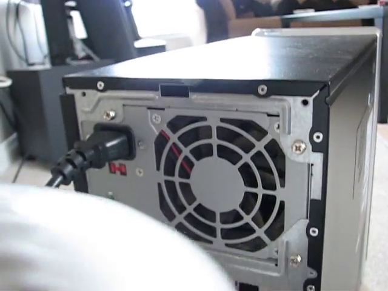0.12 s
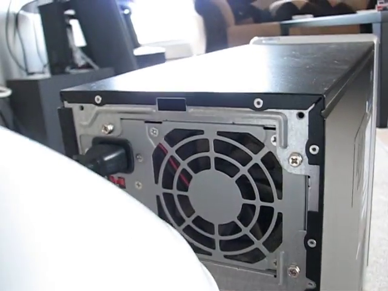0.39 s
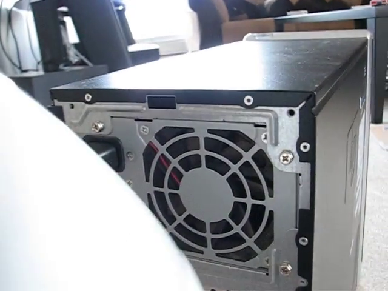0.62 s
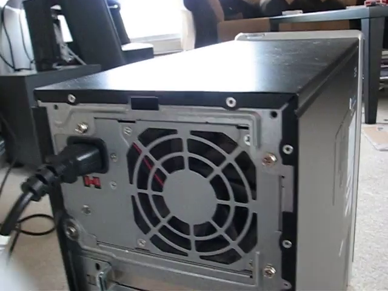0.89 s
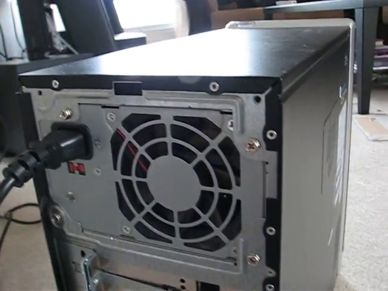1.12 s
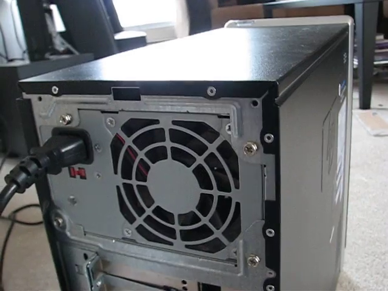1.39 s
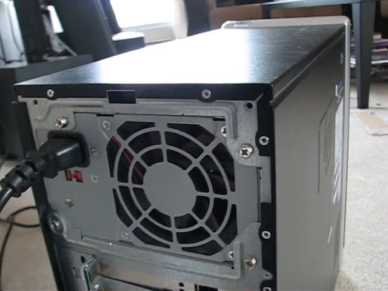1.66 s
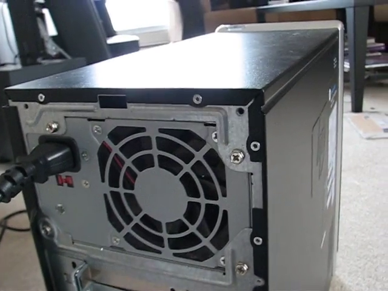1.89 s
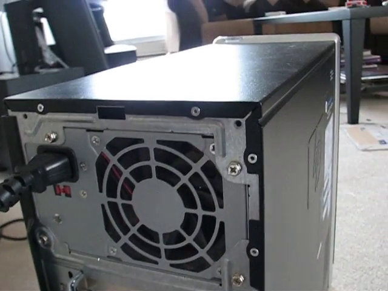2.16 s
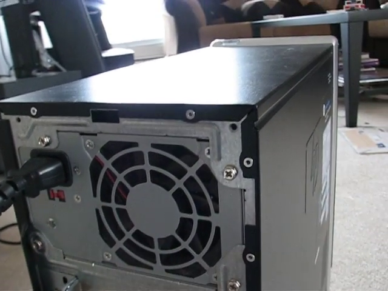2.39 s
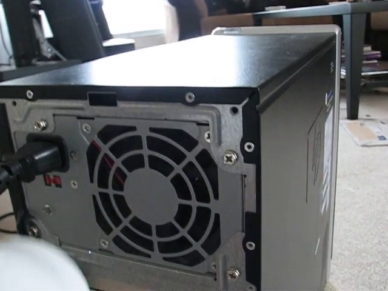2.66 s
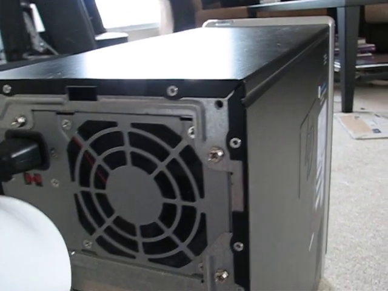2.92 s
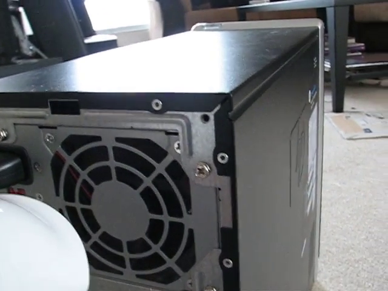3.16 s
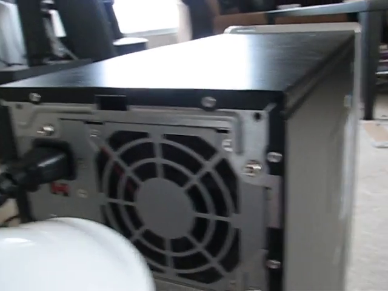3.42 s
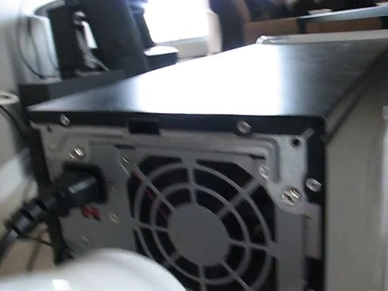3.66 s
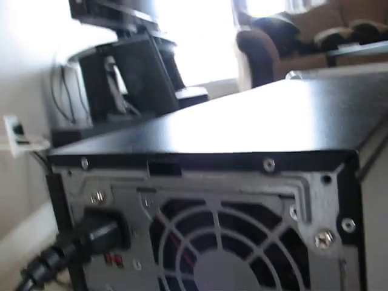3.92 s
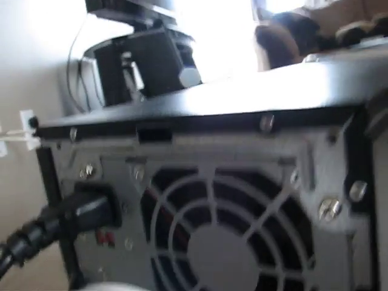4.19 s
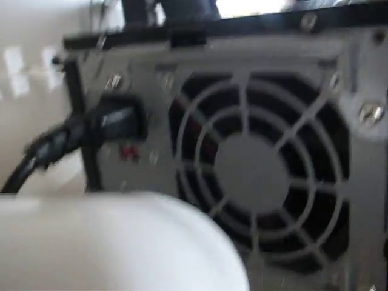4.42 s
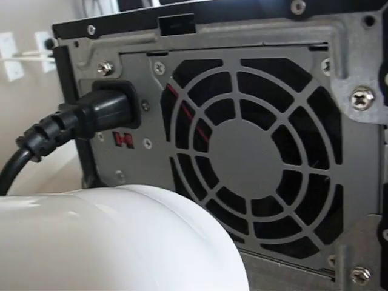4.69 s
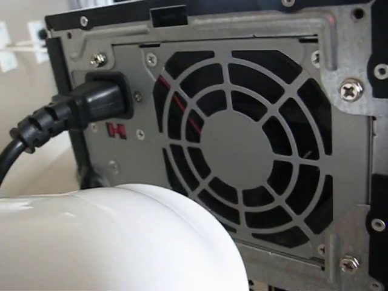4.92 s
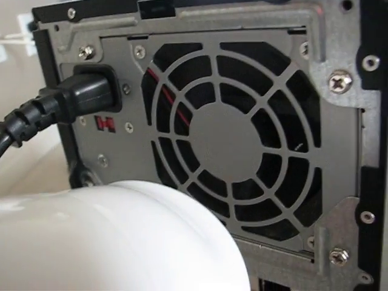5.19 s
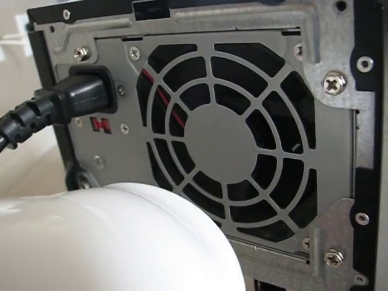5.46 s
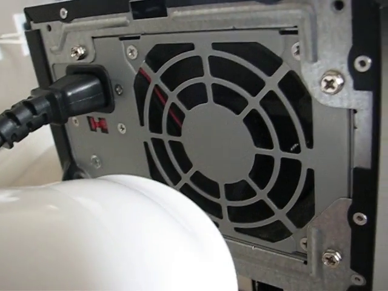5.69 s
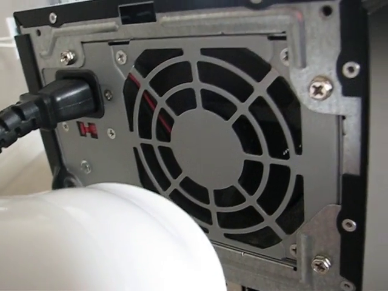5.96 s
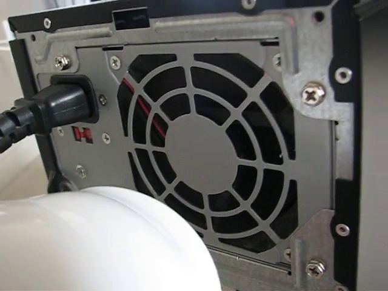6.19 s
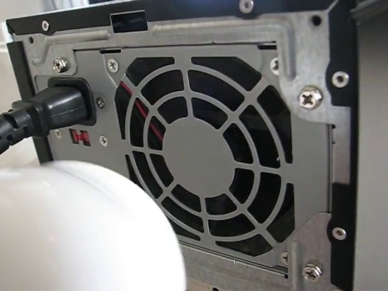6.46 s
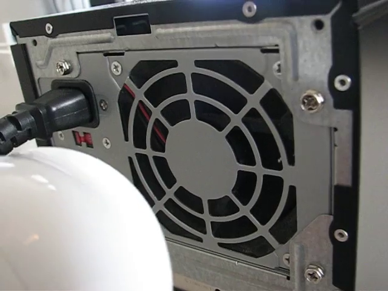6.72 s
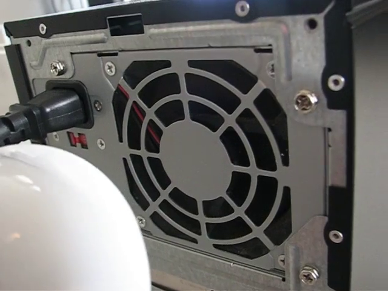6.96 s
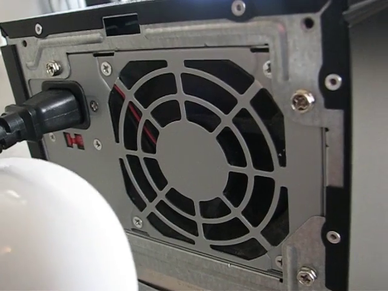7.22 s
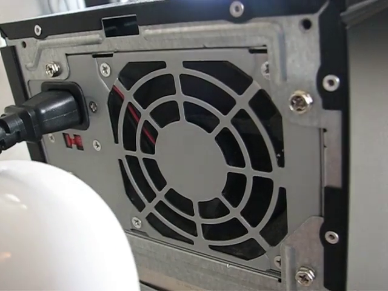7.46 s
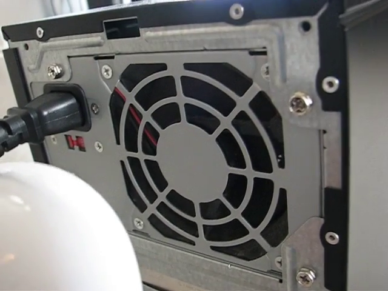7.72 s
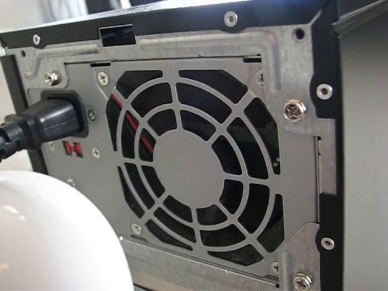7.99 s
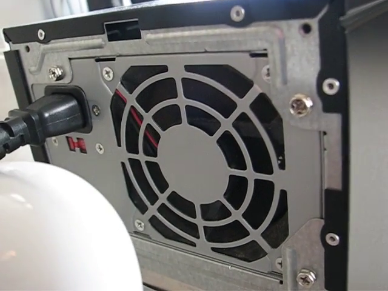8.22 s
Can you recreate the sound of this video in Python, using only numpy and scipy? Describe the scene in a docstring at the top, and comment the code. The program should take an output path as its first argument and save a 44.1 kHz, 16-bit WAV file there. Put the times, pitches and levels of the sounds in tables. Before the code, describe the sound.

Faint camera ticking, handling clatter, then a handheld dryer spins up quickly into loud rushing air and whine, shifting tone against a metal computer case.

```python
"""A small camera's drive whines and ticks over quiet room air while a hair dryer is picked up.
Its plastic shell clicks as ringing modes, skin rubs on it as grainy noise, and it knocks a metal computer case.
Switched on, it blows a rush of coloured noise, loud at first, and sines of its seven blades whine up with the shaft.
The rush changes colour as the dryer is turned and blows into the case's idle fan, which windmills: its blade tone
climbs past the dryer's shaft tone, then sinks through it to just below. Dryer and case lean mostly to the left."""
import sys
import numpy as np
from scipy import signal
from scipy.fft import rfft, irfft
from scipy.io import wavfile
from scipy.ndimage import uniform_filter1d, map_coordinates

SR = 44100
rng = np.random.default_rng(int(sys.argv[2]) if len(sys.argv) > 2 else 0)


def volts_from_db(level):
    """Convert decibel levels to linear amplitude ratios."""
    exponent = np.asarray(level, float) / 20
    return 10 ** exponent


def output_pcm(signal):
    """Save a mono or channel-first signal as 16-bit PCM at the path in sys.argv[1].

    Samples are clipped to [-1, 1] before scaling.
    """
    pcm = np.clip(np.atleast_2d(signal).T, -1, 1) * 32767
    wavfile.write(sys.argv[1], SR, np.round(pcm).astype(np.int16))


N = 368676
T = np.arange(N) / SR  # seconds
HZ = np.fft.rfftfreq(N, 1 / SR)
START_S = 1.55  # the dryer's motor starts

# Ways of holding the dryer. Each row: start in seconds, end in seconds, colour of the rush as pose 0-3,
# rush level in dB, how strongly the jet drives the case in dB.
HOLDS = [(1.55, 1.96, 0., -3.5, -30), (2.02, 2.18, 1., -1, -29), (2.3, 2.38, 1., 0, -28),
         (2.46, 2.58, 1.25, -0.1, -23.5), (2.7, 2.82, 1., -0.5, -27), (2.93, 3.08, 1., -0.7, -22),
         (3.32, 3.5, 1.37, -0.44, -16.5), (4.1, 4.55, 2., 0.93, -10), (5.2, 5.55, 2., 1.3, -5.5),
         (5.8, 6.3, 2, 1.1, -6.5), (6.62, 8.36, 3., 1.37, -1)]
# Tone of the room air. Each row: frequency in Hz, relative level in dB.
ROOM_COLOUR = [(20, -18), (55, 0), (130, -5), (340, -4.5), (590, -6.5), (734, 4), (880, -6.5),
               (3000, -15.5), (7500, -17), (9800, -21), (16000, -27)]
# Room air common to both ports. Each row: frequency in Hz, shared part 0-1.
ROOM_SHARED = [(60, 0.67), (290, 0.71), (640, 0.14), (3000, 0.082)]
# The background sinks once the dryer runs. Each row: time in seconds, gain in dB.
HUSH = [(1.6, 1), (2.8, -36)]
# Strokes of the camera drive. Each row: first stroke in seconds, period in seconds.
DRIVE_TIMES = [(.0262, 1 / 30), (.052, .098), (.045, .098), (.1295, .3), (.1295, .3)]
# Sound of those strokes. Each row: centre in Hz, width in octaves, 60 dB decay in seconds,
# strength in dB ahead of the hush.
DRIVE_STROKES = [(9000, .2, 0.012, -54), (340, 0.54, 0.094, -47), (69, .8, 0.14, -55),
                 (6200, 0.62, 0.06, -44), (12000, .3, .04, -48)]
# Clicks of the plastic shell and switch. Each row: time in seconds, snap strength in dB,
# crack strength over the snap in dB, time scale of the crack in ms.
CLICKS = [(.583, -19.5, -14, 1.), (.597, -15.5, -10, 1.9), (.829, -43, 11, 1.6), (1.068, -29, 0.5, 2.8),
          (1.239, -27, 4, 0.8), (1.4556, -41, 5, 1.2), (1.536, -13, 3, 2.2), (1.572, -14, -16, 1.)]
# Resonances of the plastic shell. Each row: frequency in Hz, relative level in dB, 60 dB decay in seconds.
SHELL_MODES = [(693, -2, 0.086), (820, -0.5, 0.06), (1110, 6, 0.015), (1640, 3, 0.0065), (2160, 6, 0.0044),
               (5270, -19, .008), (6600, -32, .02)]
# Hand rubbing on the shell. Each row: time in seconds, level in dB.
RUB = [(0.8, -61), (1.1, -47), (1.225, -46), (1.25, -43), (1.53, -54)]
# Knocks on the case. Each row: time in seconds, strength in dB, contact in ms, place across the panel 0-1.
KNOCKS = [(1.0692, -4, 0.94, 0.06), (1.161, -25, .4, 0.01), (1.223, -22, 3.1, 0.4),
          (1.246, -21, 0.53, 0.03), (1.282, -21, 1.1, 0.2), (1.296, -17, 1.5, .25)]
# Resonances of the metal panel. Each row: nominal frequency in Hz, relative level in dB ahead of the strike
# place, 60 dB decay in seconds.
CASE_MODES = [(230, -15, 0.12), (283, -1, 0.16), (392, 6, 0.053), (469, 1, 0.12), (595, 4, 0.037),
              (700, -2, 0.06), (850, -11, 0.07), (1200, -15, 0.057), (1950, 2, 0.0034)]
# Colour of the rush. Each row: frequency in Hz, then for each pose in turn: left level in dB per Hz,
# right level in dB per Hz, phase by which left leads in radians; the rush level of the hold comes on top.
POSES = [(106, -72.5, -89, 1, -76, -81, -1.5, -80, -80.5, 1, -75, -77, 0.5),
         (184, -69, -74, 0.5, -68, -73, 0.9, -71, -77, 0, -68.5, -72.5, 0.5),
         (422, -68, -73, 1, -65, -71.5, 0.5, -61.5, -68, -0.5, -61.5, -65, -2),
         (670, -51, -57.5, -0.3, -50.5, -57, 0, -52, -56, -1.5, -52.5, -56, -1.5),
         (968, -58.5, -64, 0.7, -60.5, -65.5, 0.3, -59, -67, -0.45, -60.5, -70.5, 0),
         (1680, -53.5, -62, 1, -57.5, -63, 1, -56, -60.5, 1, -56.5, -60.5, 0.5),
         (2250, -51.5, -54.5, 1.1, -52.5, -59, 2, -61, -55.5, 1.86, -63.5, -57.5, -0.36),
         (3360, -53.5, -55, 2.5, -56.5, -58.5, 2, -55, -63, -2.5, -58.5, -61.5, 2.07),
         (4800, -51.5, -54.5, 4.5, -53.5, -72, 2.5, -56, -58.5, -1.26, -55.5, -70.5, 0.5),
         (5740, -49, -64, 4.5, -56.5, -57, 2, -58, -68, -2, -54.5, -58.5, 0.9),
         (6660, -49.5, -60, 4, -54.5, -66, 1.5, -56.5, -60.5, 1, -58, -62, 1.1),
         (7070, -50, -65, 10.5, -54.5, -58.5, 1.5, -54, -59.5, 0.3, -60, -57.5, 0.2),
         (8540, -57.5, -56, 8, -63, -62.5, 1, -59.5, -58.5, 0, -65, -64, 2.5),
         (9650, -61, -73, 6, -68, -75, 1.5, -69, -69, -2, -68, -74.5, 1.5),
         (11500, -58.5, -84, 1, -62, -89, 1, -66, -86, 0.5, -68, -83, 2),
         (12830, -64, -82, -1, -71, -80, -2, -68.5, -82, 3, -69, -78, -4.5),
         (16600, -62, -82, -1, -101, -100, 2, -105, -86, 2, -102, -103, 8)]
# Rush common to both ports. Each row: frequency in Hz, shared part 0-1.
RUSH_SHARED = [(40, 1), (300, 1), (900, 0.95), (2000, 0.86), (5000, 0.58), (9000, 0.55), (14000, 0.32)]
# The rush mirrored by the case. Each row: time in seconds, extra path in ms, gain in dB.
MIRROR = [(2.1, 0.28, -28), (2.3, 0.2, -10), (2.5, 0.31, -7.5), (3.02, .2, -13), (3.25, 0.28, -16),
          (3.85, 0.28, -19), (4.2, 0.28, -16.5)]
# Blade tone (order 7), then its octave (order 14), with a row for each hold. Each row: left level in dB,
# right level in dB, phase by which left leads in radians.
BLADE = [
    [(-24.5, -30, 0.8), (-21, -44, 2.1), (-28.5, -40, 3.2), (-29, -28, 1.5), (-33, -33, 3.5),
     (-34, -30, 2.9), (-25.5, -33.5, 3.96), (-28.5, -22.5, 1.56), (-26.5, -23, 0.73), (-24, -24, 0.7),
     (-19, -26.5, 0.26)],
    [(-19.5, -28, -4), (-20.5, -27, -2.5), (-18.5, -26, 1.5), (-17, -25, 0.6), (-15, -35, -1),
     (-18, -37, -0.5), (-20, -41, -1), (-24, -21.5, -1.35), (-21, -24.5, -2.5), (-25, -23, -2.5),
     (-21, -32, -4.5)],
]
# Faint upper multiples of the shaft speed [order].
UPPER_ORDERS = (21, 28, 35)
# Their levels, with a row for each hold. Each row: orders 21, 28 and 35 in dB.
UPPER_DB = [(-25, -39, -41), (-43, -32.5, -45), (-44, -38, -40), (-38, -36, -41), (-39, -34, -40),
            (-39, -40, -41), (-33, -37, -52), (-37.5, -36, -46), (-41, -35, -52), (-38, -42, -50),
            (-36, -43.5, -42.5)]
# Their place. Each row, one for each upper order: left minus right in dB, phase by which left leads in radians.
UPPER_PLACE = [(5, 0.93), (9, 0.28), (14, 1.)]
# Low multiples of the shaft speed beside the blade tone [order].
SIDE_ORDERS = (1, 2, 5, 6)
# Level of each side order in dB at full speed.
SIDE_ORDER_DB = [-43, -42.5, -46.5, -40.5]
# Windmilling case fan. Each row: time in seconds, blade tone in Hz.
CASE_FAN = [(2.7, 85.5), (3.5, 200.3), (4.1, 265.3), (4.6, 303.4), (5.1, 326), (6.4, 322.2), (6.75, 314.5),
            (7.2, 309.2), (7.45, 303), (8.36, 301)]


def curve(rows):
    """Columns of a table, gliding over time."""
    s, *columns = np.transpose(rows)
    return [np.interp(T, s, c) for c in columns]


def held(values):
    """One value for each hold, steady while held and gliding while the hand moves on."""
    return np.interp(T, np.ravel([row[:2] for row in HOLDS]), np.repeat(values, 2))


def across(points):
    """A table of frequency and value drawn over the whole spectrum, on a log axis."""
    hz, value = np.transpose(points)
    return np.interp(np.log(HZ + 1), np.log(hz + 1), value)


def level(x, db):
    """Set the rms level."""
    return x * volts_from_db(db) / np.sqrt(np.mean(x ** 2))


def walk(rate):
    """Random levels held 1 / rate seconds and slewed twice; spread near 1."""
    k = int(SR / rate)
    steps = np.repeat(rng.standard_normal(N // k + 1), k)
    return 1.26 * uniform_filter1d(uniform_filter1d(steps, k), k)[:N]


def pan(x, db):
    """Left minus right in dB about the same mid level."""
    left, right = volts_from_db(db / 2), volts_from_db(-db / 2)
    return np.array([x * left, x * right]) * 2 / (left + right)


def filtered(x, order, hz, kind):
    """A Butterworth filter."""
    return signal.sosfilt(signal.butter(order, hz, kind, fs=SR, output="sos"), x)


def noise(left_db, right_db, alike, lead):
    """Coloured noise at two ports (dB per Hz): partly shared, and shifted in phase."""
    shared, left, right = rfft(rng.standard_normal((3, N)))
    alike = np.clip(alike, 0, 1)
    common = np.sqrt(alike) * shared * np.exp(np.outer([.5j, -.5j], lead + 0 * HZ))
    pair = common + np.sqrt(1 - alike) * np.array([left, right])
    return irfft(pair * volts_from_db(np.array([left_db, right_db])) * np.sqrt(SR / 2), N)


def ring(push, modes):
    """A force signal rings a set of decaying modes, their joint response scaled to a peak of 1."""
    t = T[:SR // 2]
    body = 0
    for hz, db, t60 in modes:
        body = body + volts_from_db(db) * np.sin(2 * np.pi * hz * t) * np.exp(-np.log(1000) * t / t60)
    return signal.fftconvolve(push, body / np.abs(body).max())[:N]


def tone(hz, db, lean_db=0., lead=0., flutter_db=2.0):
    """A sine on a moving pitch whose level flutters at random."""
    phase = 2 * np.pi * (np.cumsum(hz) / SR + rng.random())
    strength = pan(volts_from_db(db + flutter_db * walk(30)), lean_db)
    return np.sqrt(2) * strength * np.sin(phase + np.outer([.5, -.5], lead + 0 * T))


def room_air():
    """Room air: steady coloured noise, mostly shared by the ports in the bass alone."""
    colour_db = across(ROOM_COLOUR)
    return level(noise(colour_db, colour_db - 3., across(ROOM_SHARED), 0), -51)


def camera_drive():
    """The camera's drive: a thin whine, with band-limited ticks, thumps and clicks at fixed periods."""
    out = tone(8252 * (1 + 0.00048 * walk(29.6)), -56.5, lean_db=4.7, lead=2.15, flutter_db=.8)
    for (first, period), (hz, octaves, t60, db) in zip(DRIVE_TIMES, DRIVE_STROKES):
        push = np.zeros(N)
        at = (np.arange(first, T[-1], period) * SR).astype(int)
        push[at] = volts_from_db(db + 1.7 * rng.standard_normal(len(at)))
        t = T[:SR // 4]
        # every stroke shakes the same parts
        shudder = rng.standard_normal(len(t)) * np.exp(-np.log(1000) * t / t60)
        shudder = filtered(shudder, 2, hz * 2 ** (octaves * np.array([-.5, .5])), "bandpass")
        out = out + pan(signal.fftconvolve(push, shudder / np.abs(shudder).max())[:N], 3.3)
    return out


def background():
    """Room air and camera drive, sinking together once the dryer runs."""
    return (room_air() + camera_drive()) * volts_from_db(curve(HUSH)[0])


def clicks():
    """Sharp snaps ring the shell, a broad crack rides on each, and the starting motor shakes it."""
    push, crack = np.zeros(N), np.zeros((2, N))
    for s, db, crack_db, ms in CLICKS:
        i, t = int(s * SR), T[:2000] * 1000 / ms
        push[i] = volts_from_db(db)
        grains = rng.standard_normal((3, 2000))
        envelope = t * np.exp(1 - t) ** 2 + 0.54 * np.exp(-t / 5)
        crack[:, i:i + 2000] += volts_from_db(db + crack_db) * (grains[0] + 1.24 * grains[1:]) * envelope
    crack = filtered(crack, 2, [1300, 7000], "bandpass")
    jolt = np.maximum(T - START_S + 0.012, 0) / 0.037  # begins 12 ms ahead of the run-up
    shake = volts_from_db(-30) * rng.standard_normal(N) * jolt * np.exp(-jolt)
    shell = ring(push, SHELL_MODES) + ring(shake, SHELL_MODES[:2])  # the jolt moves the two lowest modes
    return pan(filtered(shell, 2, 550, "highpass"), 5.6) + crack * pan(0.32, 6.6)[:, None]


def rub():
    """Skin sliding on plastic: grainy broad noise."""
    colour_db = across([(200, 2), (900, 4), (6500, -8.5), (9000, -20)])
    skin = level(noise(colour_db, colour_db - 3.5, 0.2, 0), 0)
    grainy = volts_from_db(curve(RUB)[0] + 2.5 * walk(170))
    fade_in = np.clip((T - RUB[0][0]) / 0.12, 0, 1)
    return skin * grainy * fade_in * (T < RUB[-1][0] + .05)


def knocks():
    """Half-sine pushes ring sheet metal, each with a short noisy rattle."""
    rung = 0
    for s, db, ms, place in KNOCKS:
        push = np.zeros(N)
        i, n = int(s * SR), max(int(ms * SR / 1000), 2)
        push[i:i + n] += volts_from_db(db) * np.sin(np.pi * np.arange(n) / n) * np.pi / 2 / n
        push[i:i + 6000] += volts_from_db(db - 32.0) * rng.standard_normal(6000) * np.exp(-T[:6000] / 0.038)
        # a mode nearly sleeps when struck on its node
        share = np.abs(np.sin(np.pi * place * np.arange(1, len(CASE_MODES) + 1))) + .1
        modes = []
        for (hz, mode_db, t60), g in zip(CASE_MODES, share):
            modes.append((hz * (1 + .015 * rng.standard_normal()), mode_db + 20 * np.log10(g), t60))
        rung = rung + ring(push, modes)
    return pan(filtered(rung, 5, 195, "highpass"), 5.7)  # a small panel sheds no deep bass


def case_mirror(rush):
    """The case throws back a delayed copy of the rush; the moving path sweeps its comb colour."""
    path_ms, mirror_db = curve(MIRROR)
    late = (T - (path_ms + 0.028 * walk(2.04)) / 1000) * SR
    bright = filtered(rush, 1, [1500, 9000], "bandpass")  # long waves bend round, the shortest scatter
    return volts_from_db(mirror_db) * np.array([map_coordinates(port, [late]) for port in bright])


def air():
    """The jet and intake rush: noise coloured by pose at each port, swelling in, loud at first until the
    camera's automatic gain settles, gusting a little."""
    from_s, rise_s, early_db, settle_s = 1.534, 0.1, 5.5, 0.16
    turn, rush_db = (held(c) for c in np.transpose(HOLDS)[2:4])
    hz, *columns = np.transpose(POSES)
    left, right, lead = ([across(np.transpose([hz, c])) for c in columns[j::3]] for j in range(3))
    rush = 0
    for k in range(len(left)):
        blend = np.sqrt(np.clip(1 - np.abs(turn - k), 0, 1))  # equal-power fade between poses
        rush = rush + noise(left[k], right[k], across(RUSH_SHARED), lead[k]) * blend
    rush = filtered(rush, 2, 100, "highpass")  # the jet is too small for deep bass
    rush = rush + case_mirror(rush)
    since = np.maximum(T - from_s, 0)
    swell_in = np.clip(since / rise_s, 0, 1) ** 1.83
    settling_gain = volts_from_db(early_db * np.exp(-since / settle_s))
    return rush * swell_in * settling_gain * volts_from_db(rush_db + 0.24 * walk(90))


def mains_buzz(since):
    """A 120 Hz buzz, strong under starting load, later heard through the case."""
    load = since / 0.063  # the starting buzz peaks after 63 ms
    starting = volts_from_db(-49.5) * load * np.exp(1 - load)
    running = volts_from_db(-60 + held(np.transpose(HOLDS)[4]))
    return tone(120 + 0 * T, 0., 5.6) * (starting + running) * (since > 0)


def blade_whine(shaft, speed):
    """Seven blades pass per turn: order 7 swells through a shell resonance, its octave grows with speed."""
    shell_hz, shell_width_hz, shell_boost_db = 780, 190, 5
    boost_db = shell_boost_db / (1 + ((7 * shaft - shell_hz) / shell_width_hz) ** 2)
    whine = 0
    for order, rows, gain in zip((7, 14), BLADE, (volts_from_db(boost_db), speed ** 7.9)):
        left_db, right_db, lead = (held(c) for c in np.transpose(rows))
        wobble_db = 0.6 * np.array([walk(4), walk(2.8)])  # unsteady hand
        port_gain = volts_from_db(np.array([left_db, right_db]) + wobble_db)
        whine = whine + tone(order * shaft, 0., 0., lead, flutter_db=0.23) * port_gain * gain
    return whine


def faint_orders(shaft, speed):
    """Shaft imbalance and upper blade harmonics, which emerge only near full speed."""
    faint = 0
    for order, (lean_db, lead), db in zip(UPPER_ORDERS, UPPER_PLACE, np.transpose(UPPER_DB)):
        faint = faint + tone(order * shaft, held(db), lean_db, lead)
    for order, db in zip(SIDE_ORDERS, SIDE_ORDER_DB):
        faint = faint + tone(order * shaft, db, lean_db=8, flutter_db=1.0)
    return faint * speed ** 5.2


def motor():
    """The shaft runs up exponentially, then sags as the motor warms; its orders whine over mains buzz."""
    spin_up_s, target_hz, sag_hz_per_s = .122, 312.2, .33
    since = np.maximum(T - START_S, 0)
    speed = 1 - np.exp(-since / spin_up_s)
    shaft = (target_hz * speed - sag_hz_per_s * since) * (1 + 0.000217 * walk(15))
    sings = np.clip((since - 0.041) / 0.0072, 0, 1)  # the tones set in 41 ms after the start
    return (blade_whine(shaft, speed) + faint_orders(shaft, speed)) * sings + mains_buzz(since)


def case_fan():
    """The jet drives the idle fan: its blade tone climbs past the dryer's shaft tone, then sinks to just below."""
    swell_hz, swell_width_hz, swell_db = 311, 4, 5  # the fan tone swells near this pitch
    hz = curve(CASE_FAN)[0] * (1 + 0.00302 * walk(8))
    swell = swell_db / (1 + ((hz - swell_hz) / swell_width_hz) ** 2)
    db = -37 + held(np.transpose(HOLDS)[4]) + swell
    blade = tone(hz, db, 4.6, flutter_db=-0.5)
    rough_octave = tone(2 * hz, db - 6 + 1.6 * walk(3), 6.1, flutter_db=3.5)
    return (blade + rough_octave) * (T > CASE_FAN[0][0])


def scene():
    """Everything at the two microphone ports."""
    return background() + clicks() + rub() + knocks() + air() + motor() + case_fan()


def low_pass(x):
    """Removes everything above the highest recorded frequency."""
    return signal.sosfilt(signal.butter(12, 15900, fs=SR, output="sos"), x)


def record(dry):
    """The finished mix as the camera delivers it."""
    return low_pass(dry)


dry = scene()
out = record(dry)
output_pcm(out)
```